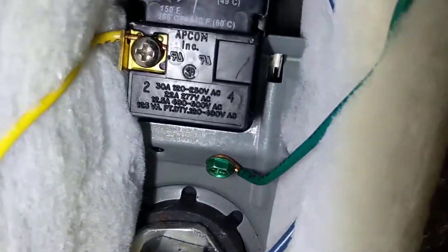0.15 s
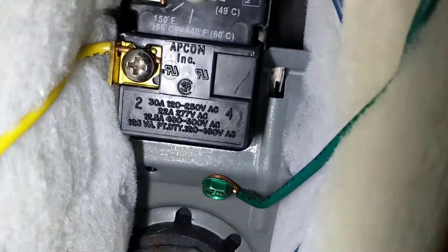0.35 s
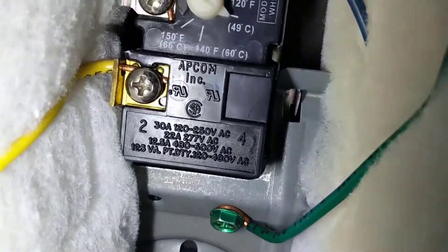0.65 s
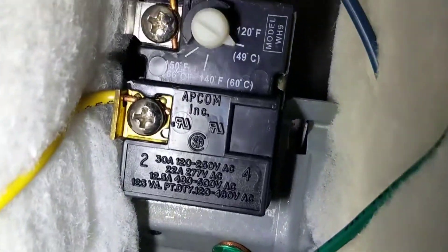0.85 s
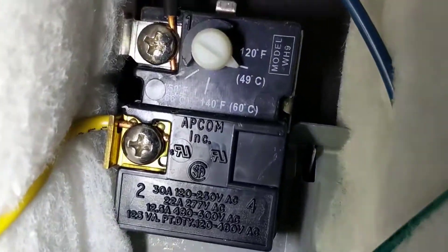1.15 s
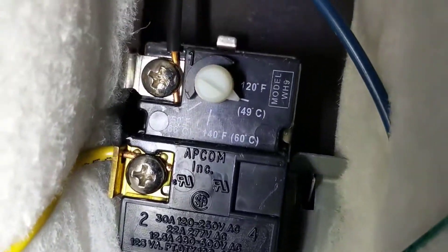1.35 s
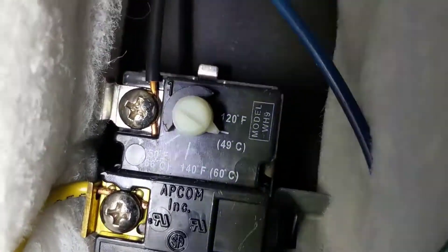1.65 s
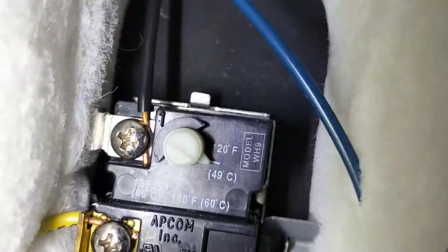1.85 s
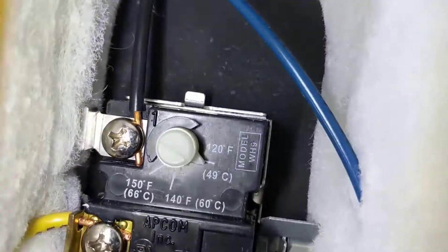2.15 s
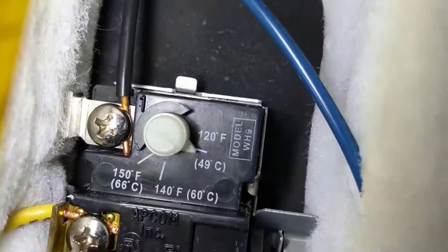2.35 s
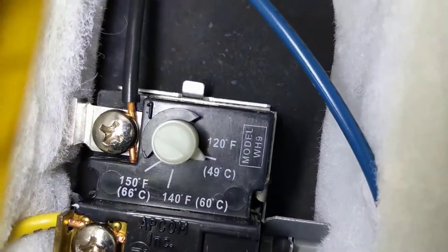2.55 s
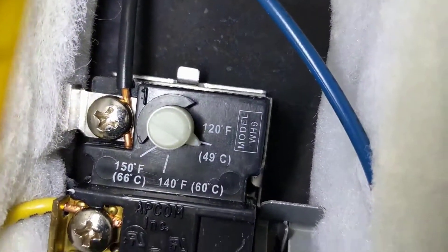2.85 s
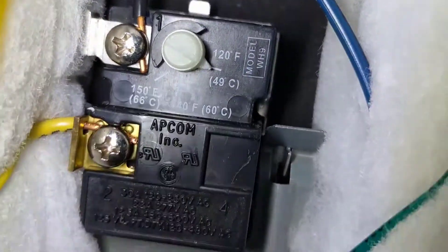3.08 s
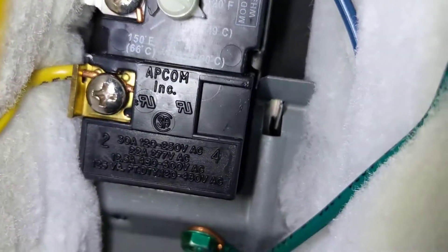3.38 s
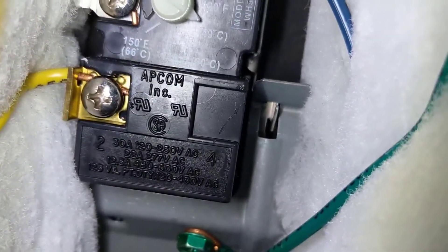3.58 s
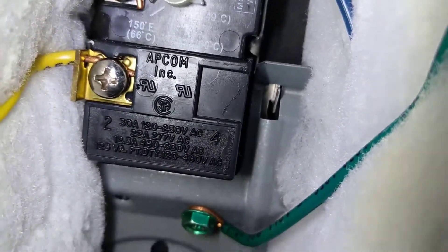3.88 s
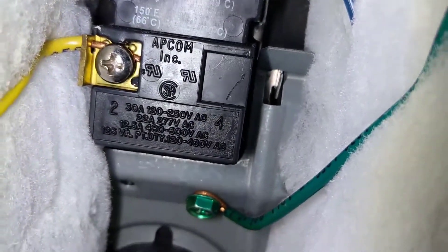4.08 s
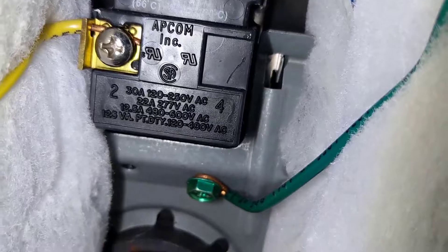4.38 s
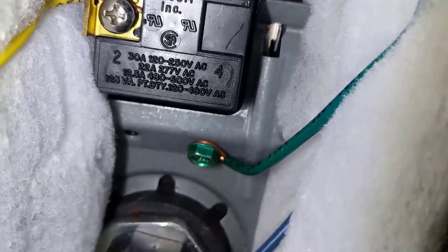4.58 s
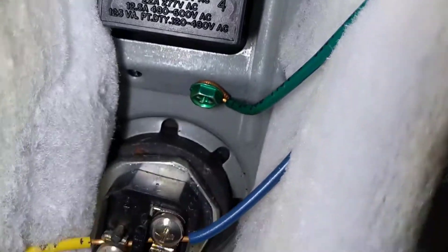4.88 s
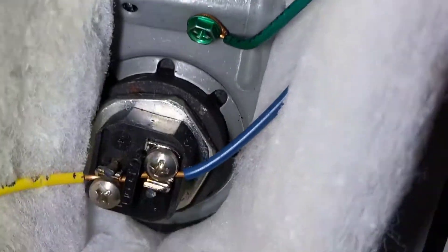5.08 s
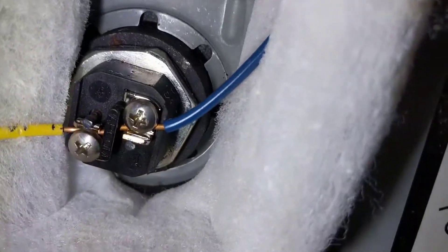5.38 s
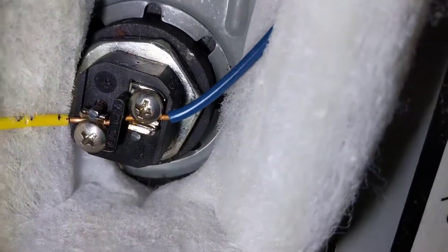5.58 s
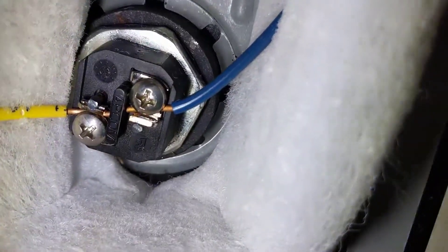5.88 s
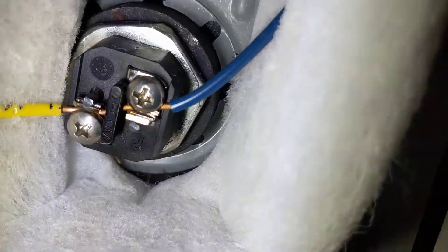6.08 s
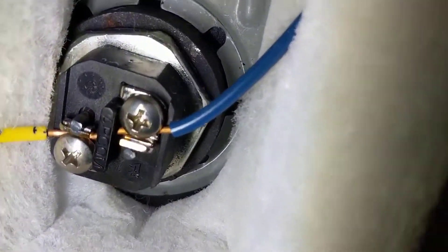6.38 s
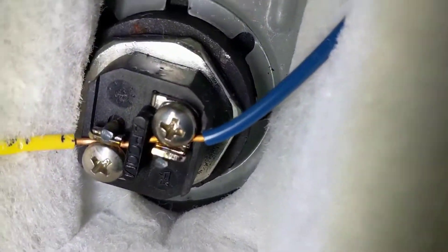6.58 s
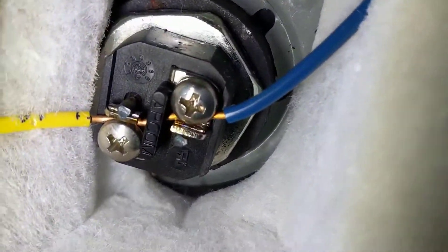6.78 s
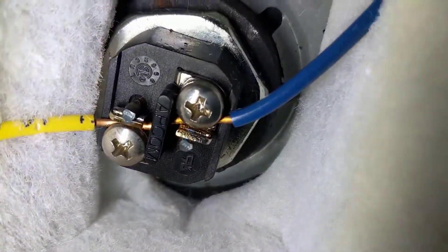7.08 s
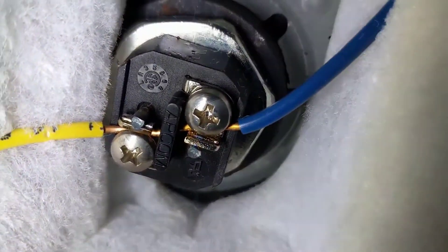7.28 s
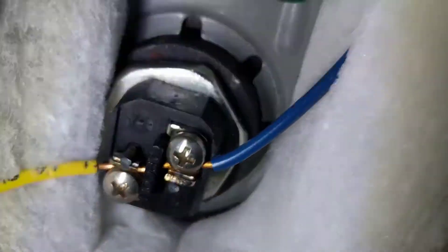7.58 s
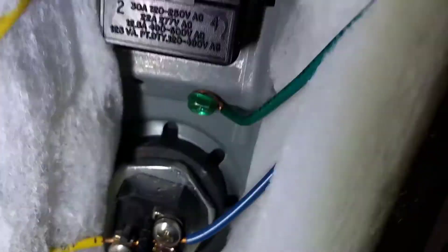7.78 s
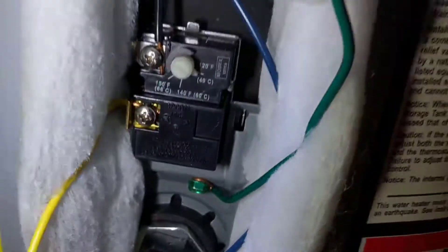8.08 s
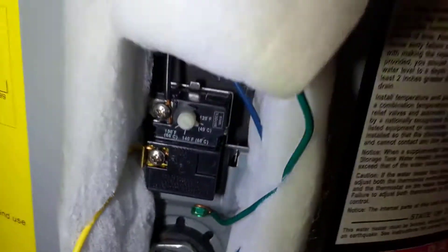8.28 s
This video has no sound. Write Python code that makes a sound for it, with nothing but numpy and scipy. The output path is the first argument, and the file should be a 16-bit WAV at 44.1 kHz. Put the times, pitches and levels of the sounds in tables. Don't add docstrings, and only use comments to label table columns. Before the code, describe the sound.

From 0 s a steady low machinery drone fills a utility room: motor and fan hum around 100 to 140 Hz, a slightly shuddering casing rumble, and a softer broadband wash of air with duct-like coloration. It begins slightly louder and settles at about 1 s. Around 2.1 s fine dry skin rustle brushes the phone microphone, growing until about 2.27 s, when a finger slides across the port: a very short bright scrape swoops down into a dull, loud, overloaded scuff, momentarily muffled. It lifts by 2.32 s, with small plastic ticks between 2.37 and 2.48 s. The background has dropped sharply, leaving quieter hum and hiss, which gradually rise back over the next four or five seconds. A bright tick comes at 4.0 s, with faint brushes at 4.1 to 4.3 s. The hiss changes tone gently as the phone moves; the drone continues to the end at about 8.4 s.

```python
import sys
import numpy as np
from scipy import signal
from scipy.io import wavfile
from scipy.ndimage import uniform_filter1d, map_coordinates

SR = 44100
rng = np.random.default_rng(int(sys.argv[2]) if len(sys.argv) > 2 else 0)


def int16_out(signal):
    q = np.round(np.clip(np.atleast_2d(signal).T, -1, 1) * 32767)
    wavfile.write(sys.argv[1], SR, q.astype(np.int16))


def ratio(d):
    e = np.asarray(d, float) / 20
    return 10 ** e


N = 372644

# (frequency [Hz], density [dB per Hz])
RUMBLE_SPECTRUM = [(15, -58), (25, -28), (40, -25), (52, -4), (66, -8.5), (87, -18), (100, 2), (120, 1),
                   (140, -2.5), (186, -8), (225, -25.5), (270, -18.5), (330, -47), (600, -80)]
HUM_HZ = [53.5, 87, 120, 137.5, 175, 210, 257.6, 841.8]
# (pitch drift [Hz], level against the rumble [dB], level waver [dB])
HUM_WAVER = [(1.3, -30, 6), (1.03, -10, 2.5), (0.99, -1.5, 2.5), (0.86, -9.5, 1), (1.15, -18.5, -1.5),
             (1, -21.5, 4.5), (0.85, -17, 1.77), (1.15, -24.5, 1.6)]
# (frequency [Hz], density [dB per Hz])
AIR_SPECTRUM = [(140, -47), (230, -8), (300, -12.5), (420, -5.5), (560, -13), (800, -14.4), (1190, -16.9),
                (1960, -18), (2200, -20.8), (3770, -23.8), (5500, -29.3), (8350, -30.2), (9800, -25.6),
                (10300, -29.3), (15800, -35.3)]
# (frequency [Hz], width [Hz], lift [dB])
DUCT = [(352.5, 31, 9.5), (414, 20, -4.5), (451, 11, 3.5), (458, 14, -7.5), (480, 25, 6.5), (607, 116, 5.5),
        (949, 102, 8), (1112, 52, 3.5), (5150, 130, 2), (5800, 170, 3.5), (6440, 80, 2.8), (7000, 70, -1.5),
        (9200, 93, 2.5), (12300, 500, 2)]
# (time [s], facing the air flow [dB], hand cupped near the port [dB])
PLACE = [(0.0, -1.9, -1.0), (0.45, 1.5, -0.8), (0.9, 1.4, -0.4), (1.5, 1.6, 1.9), (2.05, -0.3, 1.4),
         (2.35, -1.5, 1.7), (2.6, -2.5, -0.3), (3.2, -2.7, 0.8), (3.8, -1.4, 0.6), (4.2, -1.7, 3.2),
         (4.6, -0.3, 2.3), (5.05, 2.9, 0.4), (5.7, -1.2, -1.0), (6.2, -1.0, -2.2), (6.9, 3.4, -1.8),
         (7.6, 2.2, -2.3), (8.05, -2.1, -0.4), (8.45, -2.4, 0.1)]
# (frequency [Hz], share [1])
FACING_SHARE = [(300, 0.0), (700, -0.81), (1450, -0.09), (2200, 0.5), (3200, 0.3), (5500, 1.0),
                (8300, -0.44), (12000, -0.35)]
# (frequency [Hz], share [1])
CUPPING_SHARE = [(300, 0.0), (700, 0.49), (1450, 0.32), (2200, -0.22), (3200, 0.98), (5500, 1.0),
                 (8300, 0.95), (12000, 0.13)]
# (frequency [Hz], lift [dB])
LINGER_SHADE = [(300, 0.0), (700, -2.6), (1450, -0.08), (2200, -0.99), (3200, -2.08), (5500, 3.44),
                (8300, -2.7), (12000, 1.74)]
# (time [s], hold [s], level [dB])
RUSTLE = [
    (2.08, .07, -47.5),
    (2.195, .08, -41.5),
    (4.09, .025, -51),
    (4.19, .09, -58),
]
# (frequency [Hz], density [dB per Hz])
RUSTLE_COLOUR = [(300, -25), (2500, -11), (5000, -6), (8000, -2), (10000, 2.5), (15500, 1.5)]
# (time [s], peak level [dB], frequency [Hz], width [Hz])
TICKS = [
    (2.375, -37.5, 2300, 5500),
    (2.453, -48, 8000, 2500),
    (2.465, -54, 7500, 2000),
    (2.472, -45, 7200, 1800),
    (3.984, -37, 13000, 7000),
]
# (time [s], hold [s], level [dB], rise [dB per s], fall [dB per s])
SCRAPE = (2.271, .013, -28, 1000, 2500)
GRIT = (2.265, .042, -35.5, 1300, 1000)
SCUFF = (2.284, .008, -10.5, 850, 1700)

# (half-way time [s], time constant [s])
SHUT, SEAL, LIFT = (2.273, .006), (2.284, .003), (2.322, .007)
PORT_OPEN_HZ, PORT_SHUT_HZ = 7900, 1000
WIDTH_OPEN, WIDTH_SHUT = .16, .72
SCUFF_OPEN_HZ, SCUFF_SHUT_HZ = 5200, 1050
RUSTLE_RISE_DB_PER_S, RUSTLE_FALL_DB_PER_S = 260, 200
RING_DB, RING_PER_CUPPING, LINGER_DB, LINGER_UNTIL_S = 0.3, -0.2, 5.5, 4.7
REST_DB, START_DB, SETTLE_S = -40.0, 2.4, 0.98
DUCK_S, DUCK_DB, SPRING_DB, SPRING_S = 2.313, 13.0, 4.0, 0.12
CREEP_DB_PER_S, KNEE_DB = 2.8, 1.5
BASS_CUT_HZ, CLIP, EDGE_HZ = 67, .25, 15650
SHELL_EDGE_HZ, SHELL_LOST_DB, SEALED_EDGE_HZ, SEALED_LOST_DB = 8950, -9.2, 6900, -24


def rumble(t):
    wash = evened(noise(lambda hz, s: read(RUMBLE_SPECTRUM, hz) + 0 * s, size=4096))
    total = wash * ratio(2.0 * wander(t, 15.))
    for hz, (drift_hz, db, waver_db) in zip(HUM_HZ, HUM_WAVER):
        turns = np.cumsum(hz + drift_hz * wander(t, 6.)) / SR + rng.random()
        level = ratio(db + np.clip(waver_db, 0, 4) * wander(t, 3.027))
        total = total + np.sqrt(2) * level * np.sin(2 * np.pi * turns)
    return evened(total) * ratio(15.0)


def slide(t):
    out, on = np.zeros(N), abs(t - SHUT[0]) < .07
    near = t[on]
    shut = passed(near, *SHUT)
    hz = PORT_OPEN_HZ + (PORT_SHUT_HZ - PORT_OPEN_HZ) * shut
    width = WIDTH_OPEN + (WIDTH_SHUT - WIDTH_OPEN) * shut
    dull_hz = SCUFF_SHUT_HZ + (SCUFF_OPEN_HZ - SCUFF_SHUT_HZ) * (1 - shut) ** 1.3

    cosine, sine, fast, slow = rng.standard_normal((4000, 4)).T
    ring_travel = np.cumsum(hz * width) / SR
    cosine, sine = (map_coordinates(w, [ring_travel], order=3) for w in (cosine, sine))
    phase = 2 * np.pi * np.cumsum(hz) / SR
    ring = cosine * np.cos(phase) + sine * np.sin(phase)

    travel = np.cumsum(2 * dull_hz) / SR
    scuff = .6 * map_coordinates(fast, [travel], order=3)
    scuff = scuff + 0.65 * map_coordinates(slow, [.35 * travel], order=3)

    grit = evened(signal.lfilter([1], [1, -.7], rng.standard_normal(on.sum())))
    out[on] = envelope(near, *SCRAPE) * ring + envelope(near, *SCUFF) * scuff + envelope(near, *GRIT) * grit
    return out


def rustle(t):
    grain = ratio(1.8 * evened(uniform_filter1d(rng.standard_normal(N), 150)))
    level = sum(envelope(t, *stroke, RUSTLE_RISE_DB_PER_S, RUSTLE_FALL_DB_PER_S) for stroke in RUSTLE)
    level = level * (1 - passed(t, *SEAL) * (t < DUCK_S + 1))
    return level * grain * evened(noise(lambda hz, s: read(RUSTLE_COLOUR, hz) + 0 * s, size=256))


def ticks():
    out, u = np.zeros(N), np.arange(300) / SR
    for s, db, hz, width in TICKS:
        at = round(s * SR)
        ring = rng.standard_normal(300) * np.exp(-u / .0018) * np.minimum(u / .0007, 1)
        for _ in range(3):
            ring = resonate(ring, hz, width)
        out[at:at + 300] += ratio(db) * ring / abs(ring).max()
    return out


def air():
    def colour_db(hz, s):
        facing, cupping = (c - c.mean() for c in columns(PLACE, s))
        lift = sum(db / (1 + (2 * (hz - f) / w) ** 2) for f, w, db in DUCT)
        shelves = read(FACING_SHARE, hz) * facing + read(CUPPING_SHARE, hz) * cupping
        lingering = passed(s, DUCK_S, .02) - passed(s, LINGER_UNTIL_S, .2)
        shade = read(LINGER_SHADE, hz) * lingering
        port_db = RING_DB + RING_PER_CUPPING * cupping + LINGER_DB * lingering
        port = port_db / (1 + ((hz - 7850) / 320) ** 2)
        waves = drifting(len(s), len(hz), across=3, along=80) * np.clip(hz / 3500, .45, .8)
        patches = .4 * drifting(len(s), len(hz), across=28, along=8)
        return read(AIR_SPECTRUM, hz) + lift + shelves + shade + port + 2.8 * waves + patches
    return ratio(2.0) * evened(noise(colour_db, size=2048))


def columns(rows, t):
    s, *values = np.transpose(rows)
    return [np.interp(t, s, v) for v in values]


def evened(x):
    return x / np.sqrt(np.mean(x ** 2) + 1e-20)


def read(points, hz):
    f, value = np.transpose(points)
    return np.interp(np.log(hz + 1), np.log(f + 1), value)


def resonate(x, hz, width):
    turn = np.exp(2j * np.pi * np.cumsum(hz * np.ones(len(x))) / SR)
    r = np.exp(-np.pi * width / SR)
    return 2 * (turn * signal.lfilter([1 - r], [1, -r], x / turn + 1e-18)).real


def noise(colour_db, size):
    hop = size // 4
    frames, hz = N // hop + 5, np.fft.rfftfreq(size, 1 / SR)[:, None]
    a, b = rng.standard_normal((frames, size // 2 + 1, 2)).T
    z = (a + 1j * b) * ratio(colour_db(hz, np.arange(frames) * hop / SR))
    return signal.istft(z, nperseg=size, noverlap=size - hop)[1][:N]


def drifting(frames, bins, across, along):
    field = rng.standard_normal((frames, bins)).T
    return evened(uniform_filter1d(uniform_filter1d(field, across, 0), along, 1))


def wander(t, rate):
    slow = map_coordinates(rng.standard_normal(200), [t * rate], order=3)
    return evened(slow - slow.mean())


def passed(t, s, tau):
    return .5 + .5 * np.tanh((t - s) / (2 * tau))


def envelope(t, s, hold, db, rise_db, fall_db):
    return ratio(db - rise_db * np.maximum(s - t, 0) - fall_db * np.maximum(t - s - hold, 0))


def recorder_gain(t):
    since = np.maximum(t - DUCK_S, 0)
    creep_db = KNEE_DB * np.logaddexp(0, (DUCK_DB - CREEP_DB_PER_S * since) / KNEE_DB)
    ducked_db = passed(t, DUCK_S, .004) * (creep_db + SPRING_DB * np.exp(-since / SPRING_S))
    return REST_DB + START_DB * (1 - passed(t, SETTLE_S, .05)) - ducked_db


def scene():
    t = np.arange(N) / SR
    room = (rumble(t) + air()) * ratio(recorder_gain(t))
    return (room + slide(t) + rustle(t) + ticks())[None]


def roll_off(x):
    return signal.sosfilt(signal.butter(12, 15940, fs=SR, output="sos"), x)


def record(dry):
    bass_cut = signal.butter(2, BASS_CUT_HZ, "high", fs=SR, output="sos")
    mic = signal.sosfilt(bass_cut, dry)
    overloaded = mic / (1 + (mic / CLIP) ** 4) ** (1 / 4)

    hz, t, z = signal.stft(overloaded, SR, nperseg=256, noverlap=192)
    sealed = passed(t, *SEAL) * (1 - passed(t, *LIFT))
    edge_hz = SHELL_EDGE_HZ + (SEALED_EDGE_HZ - SHELL_EDGE_HZ) * sealed
    lost_db = SHELL_LOST_DB + (SEALED_LOST_DB - SHELL_LOST_DB) * sealed
    z = z * ratio(lost_db / (1 + np.exp((edge_hz - hz[:, None]) / 250)))
    muffled = signal.istft(z, SR, nperseg=256, noverlap=192)[1][:, :N]

    band_limit = signal.firwin(1023, EDGE_HZ, window=("kaiser", 9), fs=SR)
    mix = signal.oaconvolve(muffled, band_limit[None], "same")
    return roll_off(mix)


dry = scene()
out = record(dry)
int16_out(out)
```